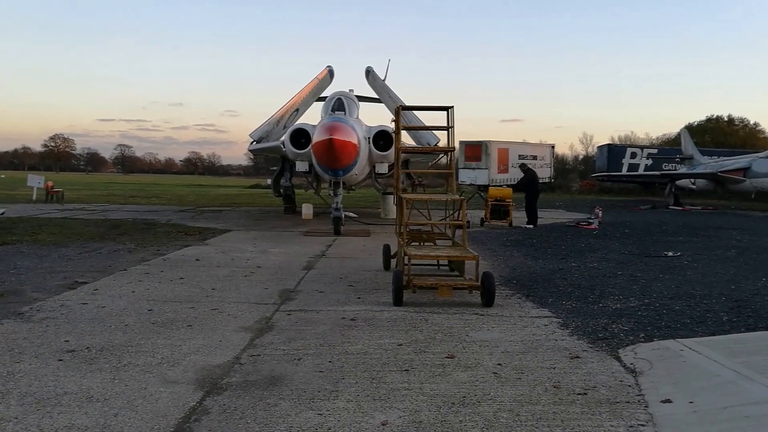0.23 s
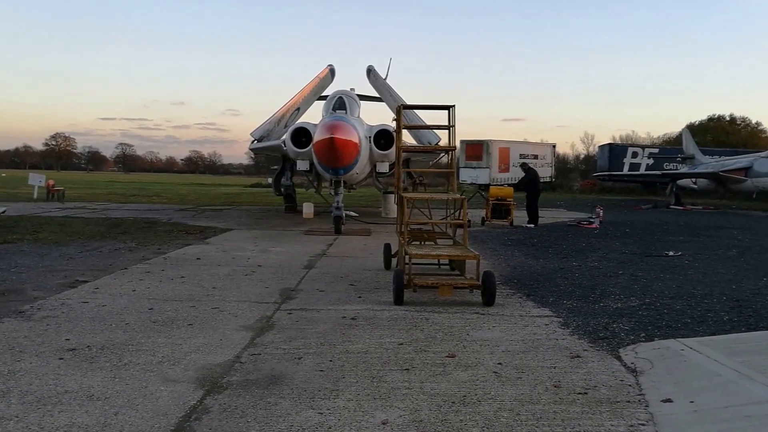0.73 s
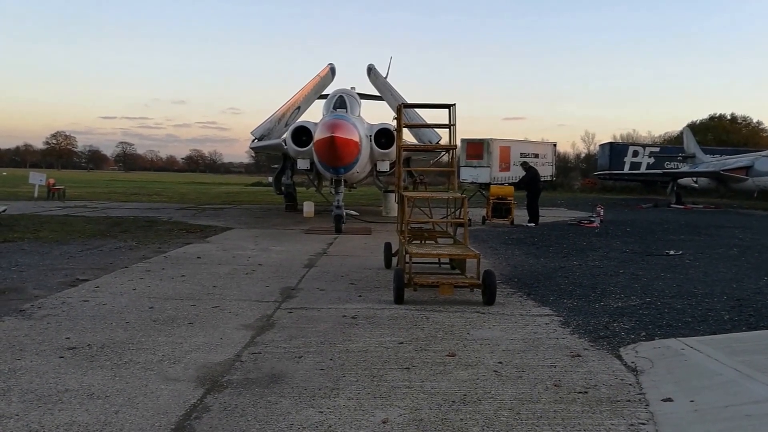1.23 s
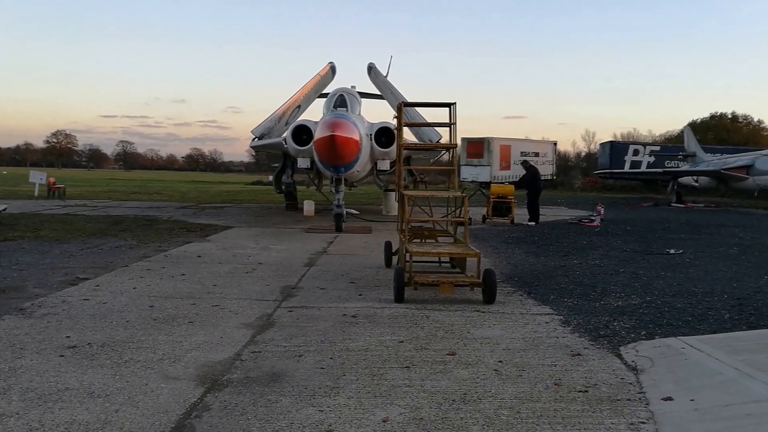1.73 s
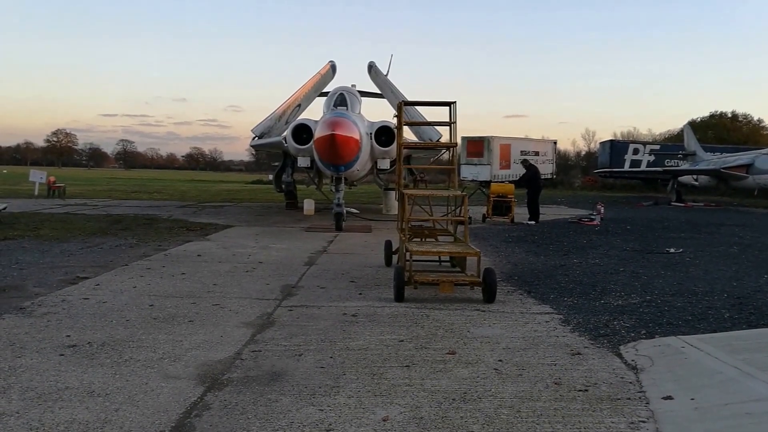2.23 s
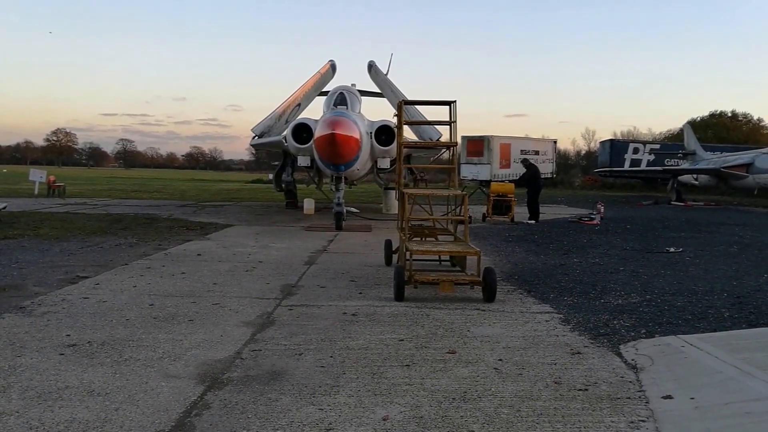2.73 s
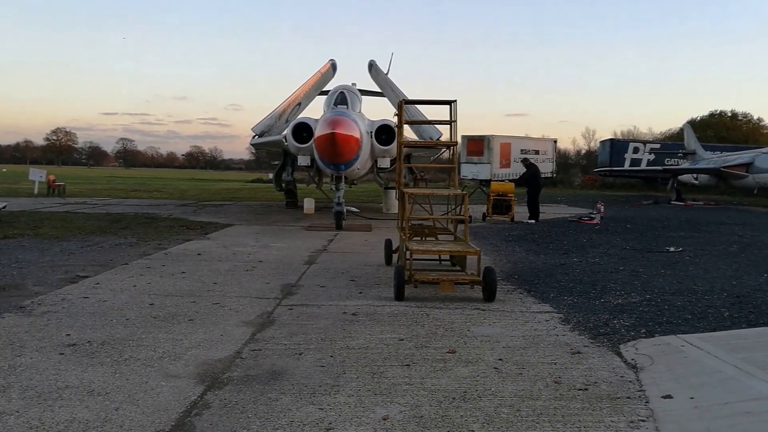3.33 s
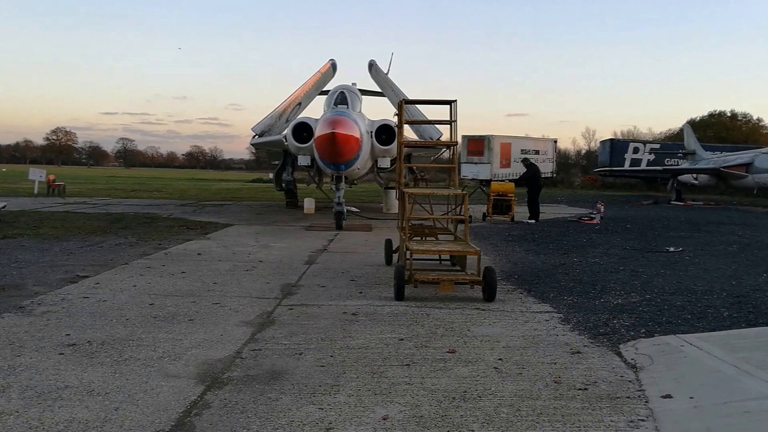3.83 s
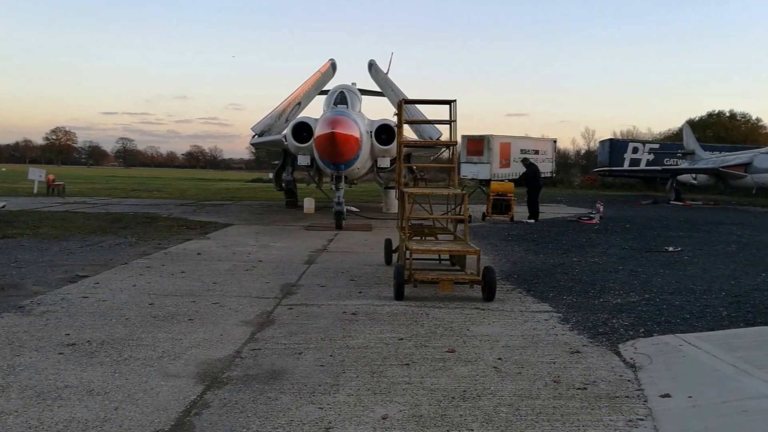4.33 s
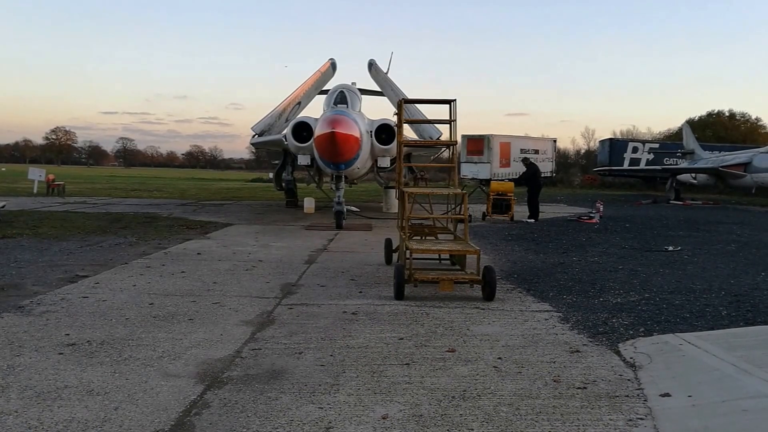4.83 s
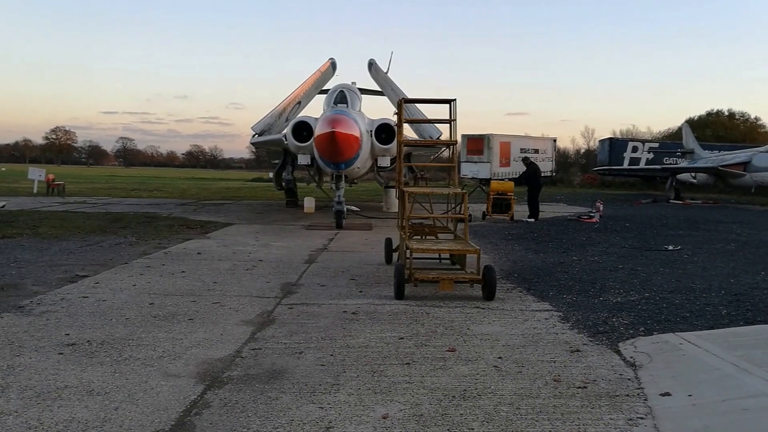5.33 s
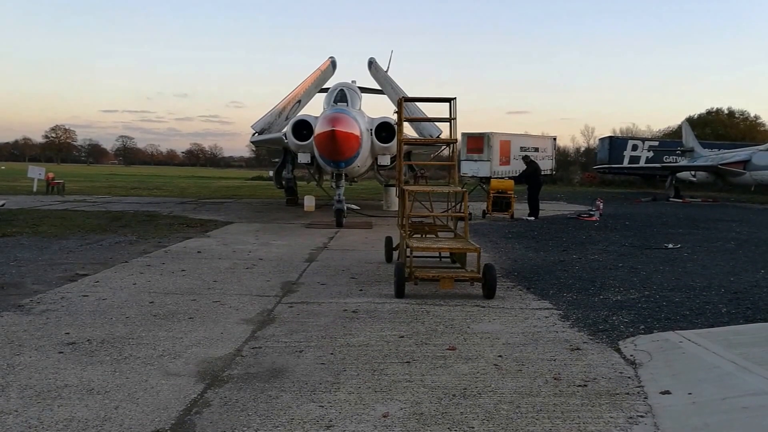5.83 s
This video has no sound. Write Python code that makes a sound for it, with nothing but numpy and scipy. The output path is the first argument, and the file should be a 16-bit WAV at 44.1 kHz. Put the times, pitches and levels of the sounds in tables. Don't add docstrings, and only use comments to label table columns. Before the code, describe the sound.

Rising turbine whine and hissing intake air on an open airfield, gusts thudding in, then a loud rough roar of blown air overtakes the whine.

```python
import sys
import numpy as np
from scipy import signal
from scipy.fft import rfft, irfft, next_fast_len
from scipy.io import wavfile
from scipy.ndimage import uniform_filter1d

SR = 44100
rng = np.random.default_rng(int(sys.argv[2]) if len(sys.argv) > 2 else 0)


def master(y):
    cut = np.clip(np.atleast_2d(y).T, -1, 1)
    pcm = np.round(cut * 32767)
    wavfile.write(sys.argv[1], SR, pcm.astype(np.int16))


def nominal_scale(level):
    x = np.asarray(level, float) / 20
    return 10 ** x


N = 267687
SIZE = next_fast_len(N)
TOP_HZ = 15700

# (frequency [Hz], level [dB per Hz])
RUSH_LEFT = [(390.0, -24.5), (990.0, -20), (1680.0, -37.5), (1980.0, -31), (2450.0, -12), (2890.0, 2.5),
             (3400.0, -7), (3940.0, -28.5), (4670.0, -13), (6760.0, -31), (7690.0, -13), (8140.0, -13),
             (10100.0, -16.5), (14300.0, -34)]
RUSH_RIGHT = [(390, -12), (620, -14.5), (740, -8.5), (1300, -18), (2000, -12.5), (2450, -3.5), (3100, -1),
              (3500, -5.5), (4850, -8.5), (5150, -14), (6000, -16.5), (7700, -9), (10000, -24),
              (15300, -58)]
# (frequency [Hz], phase [rad])
RUSH_LEAD = [(0, 0), (420, 1.8), (720, 2.0), (1000, 6.0), (1200, 7.0), (1500, 6.3), (2500, 8.9),
             (3050, 8.5), (3400, 7.1), (3900, 6.9), (4100, 9.4), (6500, 9.2), (7200, 11.8), (15000, 13.6)]
ROAR_LEAD = [(0, 0), (700, 3.0), (1300, 5.3), (1900, 7.6), (2500, 8.9), (3050, 8.5), (3400, 7.1),
             (3900, 6.9), (4100, 9.4), (5300, 8.2), (6500, 9.4), (7000, 11.3), (12000, 11.8), (15000, 13)]
# (time [s], level [dB])
RUSH = [(0, -10.5), (.75, -13.5), (1.2, -17.5), (1.9, -16), (2.6, -16.5), (3.0, -13.5), (3.85, -12.5),
        (4.2, -10), (4.6, -11.5), (4.95, -24), (5.4, -18.5), (6.07, -12.5)]


def columns(table):
    s, *values = np.transpose(table)
    return [np.interp(np.arange(N) / SR, s, v) for v in values]


def over_hz(table, scale=np.log):
    hz, value = np.transpose(table)
    bins = np.fft.rfftfreq(SIZE, 1 / SR)
    return np.interp(scale(bins + 30), scale(hz + 30), value)


def power_db(*db):
    return 10 * np.log10(sum(nominal_scale(2 * d) for d in db))


def walk(rate):
    k = int(SR / rate)
    held = np.repeat(rng.standard_normal(N // k + 1), k)
    return 1.3 * uniform_filter1d(uniform_filter1d(held, k), k)[:N]


def swells(rows):
    s, length, *db = np.transpose(rows)
    coarse_s = np.arange(0, N, 64)[:, None] / SR
    bell = nominal_scale(-24 * ((coarse_s - s) / length) ** 2)
    power = np.repeat(nominal_scale(2 * np.array(db)) @ bell.T, 64, axis=1)
    return uniform_filter1d(power, size=64)[:, :N]


def blade_rate():
    s = np.arange(N) / SR
    start_hz, a, b, c = 1117.64, .0835554, .00976419, -.000425597
    return start_hz * np.exp(a * s + b * s ** 2 + c * s ** 3), start_hz


def side_tones(hz, start_hz):
    multiples = (1, 3, 4, 5, 6, 7, 8, 9, 10)
    steady = [-50, -33, -30, -38, -42, -42, -40, -43, -43]
    # (time [s], length [s], left level [dB], right level [dB])
    low_flares = [
        [(2.5, 0.22, -35, -62), (3.0, 0.76, -33, -66), (3.65, 0.31, -32.5, -60), (4.9, 0.24, -20.5, -41),
         (5.45, 0.17, -22.5, -47)],
        [(.25, 0.22, -27, -42), (2.6, 0.83, -34, -54), (4.85, .3, -26, -44), (5.45, 0.23, -26, -19.5),
         (6.0, 0.53, -22.5, -23.5)],
        [(.3, .25, -21, -33), (.88, 0.29, -20.5, -28.5), (1.5, 0.35, -42, -60), (2.1, 0.28, -44, -48),
         (2.65, .3, -36, -46), (4.62, 0.34, -15.5, -27.5), (5.05, 0.24, -13.5, -18), (5.6, .5, -30, -37)],
        [(.8, 0.64, -40, -53), (2.42, 0.19, -28.5, -35), (2.93, 0.21, -17.5, -28), (3.4, 0.23, -25, -42),
         (3.8, 0.12, -23, -48), (4.3, 0.19, -26, -49), (4.9, 0.35, -35, -28), (5.47, .28, -28, -28)],
    ]
    # (time [s], length [s], left level [dB], right level [dB])
    high_flares = [
        [(1.35, 0.35, -34.5, -47), (2.63, 0.14, -28, -56), (3.4, 0.25, -39, -60), (4.58, 0.31, -27, -47),
         (5.05, .3, -38, -26), (5.5, .3, -32, -31)],
        [(.55, .3, -34, -52), (1.0, 0.17, -33, -49), (1.95, .2, -38, -51), (2.3, 0.23, -26.5, -47),
         (2.8, 0.14, -32, -55), (4.9, 0.19, -47, -36)],
        [(.6, .25, -33, -50), (.95, .2, -35, -52), (1.8, .25, -41, -56), (3.0, .2, -44, -60)],
        [(.9, 0.14, -47, -58), (2.5, .3, -41, -76), (3.05, .25, -36, -59), (3.5, .3, -43, -62)],
        [(2.4, .35, -45, -70)],
    ]
    # (multiple, level [dB])
    faint = [
        (3.5, -47.5),
        (5.5, -51),
    ]
    shade_db, port_share, growth_db_per_octave = -14, .6, 3
    patchy_db, twinkle_db = 2.5, 7.5
    tones = []
    for k, db, flares in zip(multiples, steady, low_flares + high_flares):
        colour_db = np.array([np.interp(k * hz, *np.transpose(port)) for port in (RUSH_LEFT, RUSH_RIGHT)])
        growth_db = growth_db_per_octave * np.log2(hz / start_hz)
        steady_db = db + port_share * colour_db + growth_db + patchy_db * walk(3.4) + [[0], [shade_db]]
        tones.append((k, *(10 * np.log10(nominal_scale(2 * steady_db) + swells(flares)))))
    for k, db in faint:
        left_db = db + twinkle_db * walk(5.24)
        tones.append((k, left_db, left_db + shade_db))
    return tones


def whine():
    # (time [s], left level [dB], right level [dB])
    main = [(0, -24, -30), (.22, -15, -23), (.58, -28, -26.5), (.8, -17.5, -24), (1.03, -10.5, -17.5),
            (1.5, -14, -26), (2.05, -4, -22.5), (2.72, -1.5, -23), (2.96, -10.5, -27), (3.12, -3, -23.5),
            (3.85, -4, -13.5), (3.98, -14, -26), (4.3, -21, -26.5), (4.62, -31, -27), (4.95, -41, -9.5),
            (5.4, -20.5, -26.5), (5.58, -16.5, -27), (6.07, -19.5, -26)]
    # (time [s], level [dB])
    shaft = [
        (0, -61),
        (3.25, -62),
        (3.35, -45.5),
        (4.0, -40),
        (4.7, -54),
        (5.0, -55),
        (6.07, -60),
    ]
    lift_db, waver_db = .6, 1.23
    slow_rad, flutter_rad = .12, .14
    hz, start_hz = blade_rate()
    shaft_db, = columns(shaft)
    tones = [(2, *columns(main)), (1 / 8, shaft_db, shaft_db)] + side_tones(hz, start_hz)
    turns = np.cumsum(hz) / SR
    lead_hz, lead = np.transpose(RUSH_LEAD)
    out = 0
    for k, left_db, right_db in tones:
        phase = 2 * np.pi * (k * turns + rng.random()) + slow_rad * walk(60) + flutter_rad * walk(900)
        pair = np.sin([phase, phase - np.interp(k * hz, lead_hz, lead)])
        side_lift_db = lift_db * (k != 2) * (2 + k) ** 0.25
        level_db = np.array([left_db, right_db]) + side_lift_db + waver_db * walk(40)
        out = out + np.sqrt(2) * pair * nominal_scale(level_db) * (k * hz < TOP_HZ)
    return out


def sputter():
    pops_per_s = 900
    when, size = rng.random((2, N))
    pops = -(1.6 + size) * (when < pops_per_s / SR)
    return pops / pops.std()


def ports(left, right, alike, lead, grit=0.):
    common, own, pops = rfft([*rng.standard_normal((2, N)), sputter()], SIZE)
    grit = np.clip(grit, 0, 1) / (1 + (np.fft.rfftfreq(SIZE, 1 / SR) / 3000) ** 4)
    common = np.sqrt(1 - grit) * common + np.sqrt(grit) * pops
    share = np.clip(over_hz(alike), 0, 1)
    delayed = common * np.exp(-1j * over_hz(lead, np.abs))
    late = share * delayed + np.sqrt(1 - share ** 2) * own
    pair = irfft([common * nominal_scale(over_hz(left)), late * nominal_scale(over_hz(right))], SIZE)[:, :N]
    return pair / pair.std(axis=1, keepdims=True)


def bounce(x):
    delay_ms, strength, top_hz = 4.2, 0.45, 780
    hz = np.fft.rfftfreq(SIZE, 1 / SR)
    echo = strength * np.exp(-2j * np.pi * hz * delay_ms / 1000) / (1 + (hz / top_hz) ** 4)
    return irfft(rfft(x, SIZE) * (1 + echo), SIZE)[:, :N]


def brighten(x):
    bright_hz, bright_db_per_s = 3653, 1.28
    thin_hz, thin_db_per_s = 2320, -0.3
    s = np.arange(N) / SR - N / SR / 2
    high = signal.sosfilt(signal.butter(4, bright_hz, "high", fs=SR, output="sos"), x)
    low = signal.sosfilt(signal.butter(4, thin_hz, fs=SR, output="sos"), x)
    middle = signal.sosfilt(signal.butter(4, [thin_hz, bright_hz], "band", fs=SR, output="sos"), x)
    return middle + high * nominal_scale(bright_db_per_s * s) + low * nominal_scale(thin_db_per_s * s)


def intake_rush(swell_db):
    # (frequency [Hz], common share [0-1])
    alike = [(60, 0.9), (500, 0.86), (950, 0.75), (1500, 1), (1900, 0.23), (2500, 0.84), (3000, 0),
             (3500, 1), (3950, 0), (4800, 0.5), (5300, 0.53), (8500, 0.45), (14000, 0.4)]
    closed = [(340, -63)]
    shade_db = -14
    left_db, = columns(RUSH)
    noise = ports(closed + RUSH_LEFT, closed + RUSH_RIGHT, alike, RUSH_LEAD)
    return brighten(bounce(noise)) * nominal_scale(np.array([left_db, left_db + shade_db]) + swell_db)


def roar_db():
    # (time [s], level [dB])
    blowing = [(0, -31.5), (.75, -32.5), (.95, -41), (1.5, -39.5), (1.9, -41), (2.1, -28.5), (3.2, -25.5),
               (3.88, -24), (3.96, -50), (4.1, -29), (4.22, -30), (4.46, -26), (4.56, -17), (4.8, -9),
               (5.1, -11.5), (5.55, -8), (5.7, -11), (6.07, -12.5)]
    # (time [s], length [s], roar level [dB], thud level [dB])
    gusts = [(1.95, 0.087, -48, -50), (2.13, 0.055, -34, -41), (2.4, 0.11, -28, -53), (2.58, .15, -40, -46),
             (2.7, 0.19, -26, -54), (3.03, 0.089, -22.5, -39), (3.38, 0.16, -20, -40),
             (3.52, 0.18, -20.5, -42), (3.75, 0.18, -22, -47), (4.3, 0.15, -27, -43),
             (4.65, 0.096, -30, -33), (5.3, 0.24, -11.5, -43)]
    gust_db, thud_db = 10 * np.log10(swells(gusts) + 1e-12)
    return power_db(*columns(blowing), gust_db), thud_db


def starter_roar(swell_db):
    # (frequency [Hz], level [dB per Hz])
    left = [(390, -5), (1100, -2.5), (1440, -1.5), (2350, -3.5), (3140, -1), (3770, -6.5), (4650, -4.5),
            (5340, -7.5), (6910, -11), (7800, -4), (10060, -4.5), (12790, -11.5), (15500, -17.5)]
    right = [(390, -3), (1590, -11.5), (2910, -7), (3230, -7), (3900, -5), (4760, -2.5), (5660, -9),
             (7360, -10), (8200, -10.5), (10590, -8.5), (13000, -30), (15500, -54)]
    # (frequency [Hz], common share [0-1])
    alike = [(60, 0.87), (500, 0.9), (1000, 0.54), (1500, 0.73), (2300, 0.37), (5500, 0.35), (8200, 0.32),
             (9500, 0.21), (14000, 0.64)]
    closed = [(340, -63)]
    shade_db, shade_slope, far_hiss_db = -6.5, 1.19, -46
    flicker_db = .6
    left_db, _ = roar_db()
    right_db = power_db(shade_slope * left_db + shade_db, far_hiss_db)
    noise = ports(closed + left, closed + right, alike, ROAR_LEAD, grit=.9)
    return noise * nominal_scale(np.array([left_db, right_db]) + swell_db + flicker_db * walk(20))


def rumble():
    # (frequency [Hz], level [dB per Hz])
    deep = [(15, -14), (30, 0.5), (60, 7.5), (120, 10), (135, -34.5)]
    bass = [(120, -9.5), (135, 3.5), (180, -3), (230, -1), (280, -2.5), (335, -0.5), (385, 2), (400, -45)]
    # (frequency [Hz], common share [0-1])
    alike = [(20, .98), (400, .97)]
    deep_slope, deep_under_roar_db = 1.13, -23
    bass_under_roar_db, bass_under_rush_db, bass_lift_db = -20, -32.5, 2.0
    (rush,), (roar, thuds) = columns(RUSH), roar_db()
    deep_db = power_db(deep_slope * roar + deep_under_roar_db, thuds)
    bass_db = power_db(roar + bass_under_roar_db, rush + bass_under_rush_db) + bass_lift_db
    pan_db = 5.5 + 0.15 * roar
    deep_pair = ports(deep, deep, alike, ROAR_LEAD) * nominal_scale(deep_db)
    bass_pair = bounce(ports(bass, bass, alike, ROAR_LEAD)) * nominal_scale(bass_db)
    return (deep_pair + bass_pair) * nominal_scale(np.array([pan_db, -pan_db]) / 2)


def scene():
    swell_db = .3 * walk(8.7)
    return whine() + intake_rush(swell_db) + starter_roar(swell_db) + rumble()


def low_pass(x):
    return signal.sosfilt(signal.butter(12, 15710, fs=SR, output="sos"), x)


def record(dry):
    lopsided, knee = .025, 9.0
    bent = dry - lopsided * dry ** 2
    flat = bent / (1 + np.abs(bent) ** knee) ** (1 / knee)
    mix = signal.sosfilt(signal.ellip(8, .2, 70, TOP_HZ, fs=SR, output="sos"), flat)
    return low_pass(mix)


dry = scene()
out = record(dry)
master(out)
```